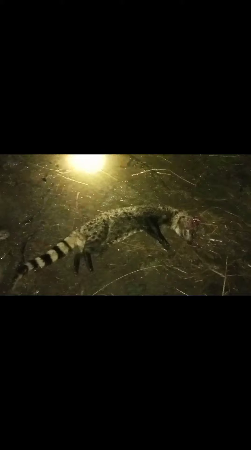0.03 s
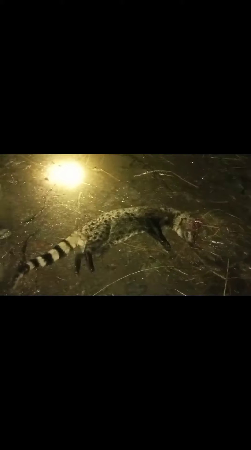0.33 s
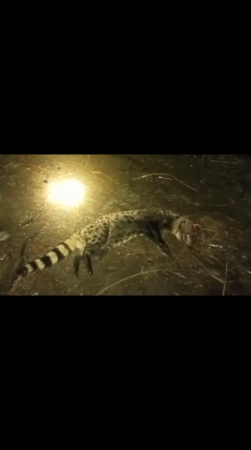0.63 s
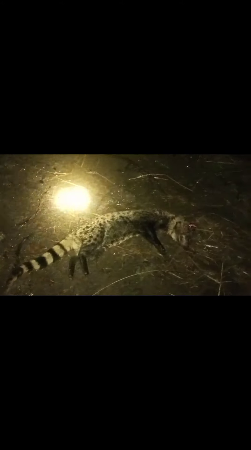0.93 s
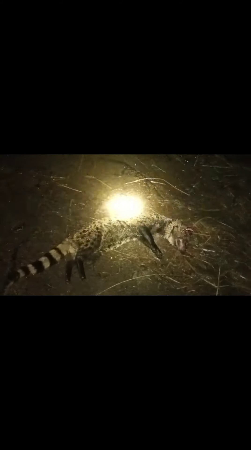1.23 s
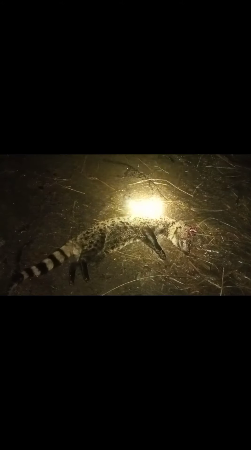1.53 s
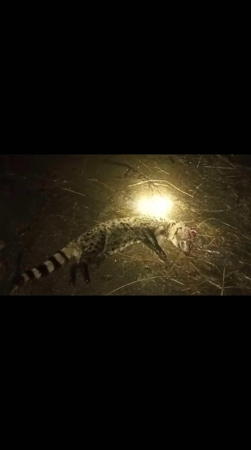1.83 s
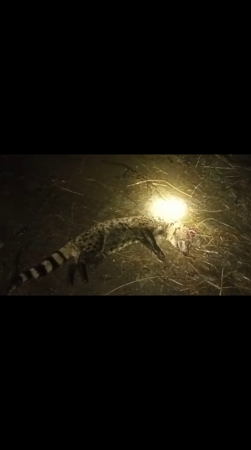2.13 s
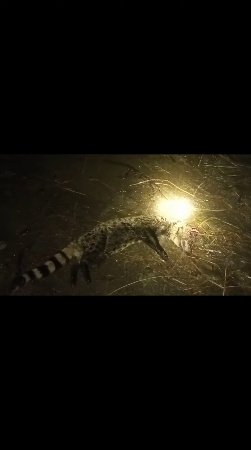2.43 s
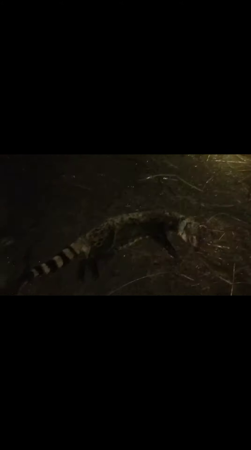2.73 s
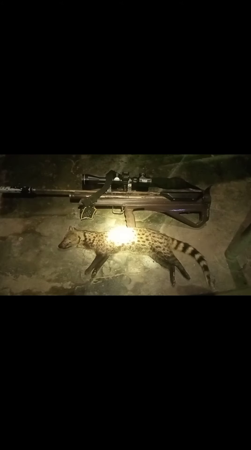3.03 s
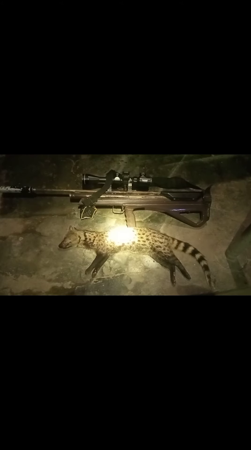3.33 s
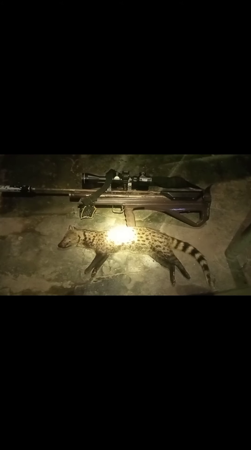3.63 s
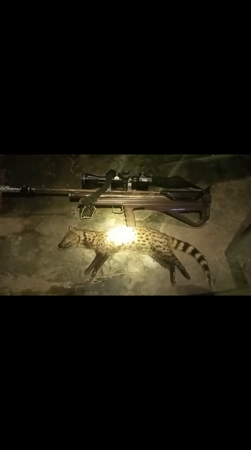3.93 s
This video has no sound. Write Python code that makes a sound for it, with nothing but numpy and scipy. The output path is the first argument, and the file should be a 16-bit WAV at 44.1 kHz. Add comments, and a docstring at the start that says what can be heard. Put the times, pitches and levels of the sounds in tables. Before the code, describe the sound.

Crickets chirp over a dense night insect chorus, then a quieter chorus swells in waves.

```python
"""Two close crickets trade chirps for a second, each wing stroke a pulse that falls as the wing slows.
Behind them a dense night chorus trills through the foliage, over a low rumble and faint hiss;
a tiny insect ticks very high, and something taps lightly a few times.
After a cut to silence a quieter place fades in, where the chorus swells in slow waves
and one insect gives three short calls and a much fainter one."""
import sys
import numpy as np
from scipy import signal
from scipy.fft import rfft, irfft
from scipy.io import wavfile

SR = 44100
rng = np.random.default_rng(int(sys.argv[2]) if len(sys.argv) > 2 else 0)


def master(y):
    """Save y as 16-bit WAV."""
    cut = np.clip(np.atleast_2d(y).T, -1, 1)
    pcm = np.round(cut * 32767)  # scale
    wavfile.write(sys.argv[1], SR, pcm.astype(np.int16))


N = 176400
T = np.arange(N) / SR
CUT_S, RESUME_S, FADE_IN_S = 2.801, 2.895, .14


def from_db(db):
    """Decibels to gain."""
    return 10 ** (np.asarray(db) / 20)


def unit_power(x):
    """Scale to an RMS of 1."""
    return x / np.sqrt(np.mean(x ** 2) + 1e-20)


def fader(rows):
    """Gain riding a curve of (time [s], level [dB])."""
    return from_db(np.interp(T, *np.transpose(rows)))


def drift(turns_per_s):
    """A smooth random wander, roughly 1 either way."""
    return np.interp(T * turns_per_s, np.arange(400), rng.standard_normal(400))


def pulses(times, gains, pitches, width_s, fall_hz_per_s):
    """Wing strokes: bell-shaped tone pulses whose pitch falls as the wing slows."""
    half = int(4.2 * width_s * SR) + 1
    offsets = np.arange(-half, half)
    t = offsets / SR
    cycles = np.reshape(pitches, (-1, 1)) * t - .5 * fall_hz_per_s * t ** 2 + rng.random((len(times), 1))
    bell = np.exp(-.5 * (t / width_s) ** 2)
    wave = np.reshape(gains, (-1, 1)) * bell * np.sin(2 * np.pi * cycles)
    at = (np.reshape(times, (-1, 1)) * SR).astype(int) + offsets
    inside = (at >= 0) & (at < N)
    return np.bincount(at[inside], wave[inside], N)


def foliage(x, t60, wet_db):
    """Leaves and trunks scatter a short dying tail behind the direct sound."""
    t = T[:SR // 5]
    tail = rng.standard_normal(len(t)) * from_db(-60 * t / t60) * (t > .004)
    return x + from_db(wet_db) * signal.oaconvolve(x, tail / np.linalg.norm(tail))[:N]


def trill(kind, uneven_db, insects, wet_db=-5):
    """Several insects of one kind, each stroking at its own rate; unit power."""
    hz, scatter_hz, width_s, strokes_per_s = kind
    out = 0
    for _ in range(insects):
        timing, force, detune = rng.standard_normal((400, 3)).T
        beats = np.cumsum(1 + .13 * timing) - 1 - rng.random()
        times = beats / (strokes_per_s * rng.uniform(.75, 1.25))
        live = times < T[-1]
        gains = from_db(uneven_db * np.clip(force[live], -2, 2))
        pitches = hz + scatter_hz * np.clip(detune[live], -2, 2)
        out += pulses(times[live], gains, pitches, width_s, fall_hz_per_s=.004 * hz / width_s)
    return unit_power(foliage(out, t60=.2, wet_db=wet_db))


def air(spectrum, heave):
    """Outdoor rumble and hiss: shaped noise whose low end rides the gain given as heave."""
    hz, db = np.transpose(spectrum)
    bins_hz = np.maximum(np.arange(N // 2 + 1) * SR / N, 1)
    eq = from_db(np.interp(np.log(bins_hz), np.log(hz), db))
    noise = unit_power(irfft(rfft(rng.standard_normal(N)) * eq, N))
    rumble = signal.sosfiltfilt(signal.butter(2, 260, fs=SR, output="sos"), noise)
    return noise + rumble * (heave - 1)


# tone of the first place's air (frequency [Hz], relative level [dB])
FIRST_AIR_EQ = [(25, -33), (45, -21), (70, -8), (110, 1), (180, -0.5), (250, -11.5), (340, -8.5),
                (600, -14), (850, -20), (1060, -16), (1350, -22), (1900, -15.5), (2700, -16), (4000, -26.5),
                (6500, -32), (7600, -40), (8700, -30.5), (9500, -37), (10300, -35), (11900, -51),
                (13100, -46), (15300, -46.5)]
# heave of its rumble (time [s], relative level [dB])
RUMBLE_RIDE = [(0.0, -59), (0.08, -52), (0.12, -63), (0.17, -54.5), (0.57, -61), (0.6, -54.5), (0.66, -59),
               (0.74, -53.5), (0.86, -63.5), (0.87, -58), (1.66, -58), (2.19, -59), (2.21, -52.5),
               (2.52, -63), (2.6, -52.5), (2.66, -63), (2.69, -53.5), (2.78, -57.5)]


def first_air(level_db=-54.5, fall_db_per_s=.52):
    """The bed of the first place: a heaving rumble and faint hiss, easing down."""
    heave = unit_power(fader(RUMBLE_RIDE) * from_db(2 * drift(21.97)))
    return from_db(level_db - fall_db_per_s * (T - CUT_S / 2)) * air(FIRST_AIR_EQ, heave)


# tone of the second place's air (frequency [Hz], relative level [dB])
SECOND_AIR_EQ = [(25, -17.5), (45, -15), (80, -2), (160, 1.5), (240, -6.5), (450, -10.5), (900, -17.5),
                 (1800, -18), (2700, -16), (4200, -27.5), (5100, -35.5), (7300, -27), (8200, -47.5),
                 (11000, -52.5), (13500, -46.5), (15500, -46)]


def second_air(level_db=-60):
    """The bed of the second place: quieter, with a steadier rumble."""
    return from_db(level_db) * air(SECOND_AIR_EQ, heave=from_db(.86 * drift(14)))


def ticking_insect(ticks_per_s=17, hz=11460, level_db=-84.5):
    """A tiny insect ticks unevenly, very high, blurred by the leaves."""
    timing, force, detune = rng.standard_normal((120, 3)).T
    times = np.cumsum(1 + .25 * timing) / ticks_per_s
    gains = from_db(level_db + 2 * force)
    ticks = pulses(times, gains, hz + 50 * detune, width_s=.0045, fall_hz_per_s=22000)
    return foliage(ticks, t60=.1, wet_db=-5)


# distant wash of trills (pitch [Hz], scatter [Hz], pulse half-width [s], stroke rate [1/s])
WASH_KINDS = [(2480, 220, .001, 60), (3400, 300, .001, 50), (5730, 140, .0012, 55), (6290, 120, .0014, 45)]
SWELLING_KIND, THROBBING_KIND = (2400, 78, .0018, 52), (6970, 90, .0018, 51)
# mix of the wash, kind by kind (level [dB])
WASH_MIX = [-66, -84, -78, -77.5]
# crests of the swelling trill (time [s], relative level [dB])
SWELLS = [(3.03, -5), (3.3, 2), (3.635, 2), (3.95, -0.5)]


def swelling_chorus(swell_width_s=.052, trough=.045, throb_period_s=.116, throb_peak_s=3.483, wet_db=3):
    """Distant low trills swell together about three times a second under a thin throbbing high one."""
    swell = trough + sum(from_db(db) / (1 + ((T - s) / swell_width_s) ** 2) for s, db in SWELLS)
    throb = 1 + .42 * np.cos(2 * np.pi * (T - throb_peak_s) / throb_period_s)
    out = from_db(-53.5) * swell * trill(SWELLING_KIND, uneven_db=1.2, insects=6, wet_db=wet_db)
    out += from_db(-71.5) * throb * trill(THROBBING_KIND, uneven_db=1.5, insects=4, wet_db=wet_db)
    for kind, db in zip(WASH_KINDS, WASH_MIX):
        out += from_db(db + .8 * drift(16)) * trill(kind, uneven_db=2, insects=4, wet_db=wet_db)
    return out


# top of the first chorus (pitch [Hz], scatter [Hz], pulse half-width [s], stroke rate [1/s])
HIGH_KINDS = [(5560, 130, .0014, 60), (5765, 35, .003, 26), (6010, 120, .0014, 56)]
TOP_KIND = (6365, 85, .0018, 49)
# mix of the three high kinds (level [dB])
HIGH_MIX = [-63.5, -63, -64.5]
# surges of the topmost kind (time [s], level [dB])
TOP_RIDE = [(0.0, -69), (0.02, -59), (0.21, -67), (0.23, -64), (0.92, -63), (1.01, -72), (1.2, -62),
            (1.37, -71), (1.45, -58.5), (1.66, -73), (1.76, -58), (1.97, -72), (2.05, -59), (2.28, -73),
            (2.35, -63.5), (2.78, -65)]


def high_trills():
    """Three high kinds flicker independently while a fourth surges above them."""
    shimmer = sum(from_db(db + 2.2 * drift(24)) * trill(kind, uneven_db=2.5, insects=4)
                  for kind, db in zip(HIGH_KINDS, HIGH_MIX))
    return shimmer + fader(TOP_RIDE) * trill(TOP_KIND, uneven_db=2.5, insects=6)


# grainy and ringing midrange kinds (pitch [Hz], scatter [Hz], pulse half-width [s], stroke rate [1/s])
GRAINY_KINDS = [(2540, 60, .0016, 50), (2880, 60, .0018, 52), (3500, 80, .002, 58), (3690, 55, .0022, 45)]
RINGING_KINDS = [(3010, 45, .003, 48), (3185, 35, .0034, 44)]
# mix of each group ahead of its fader (level [dB])
GRAINY_MIX = [-65.5, -66.5, -60.5, -65.5]
RINGING_MIX = [-3, -2]
# fader of each group (time [s], level [dB])
GRAINY_RIDE = [(0, -1), (.45, 1.5), (.9, 3.5), (1.2, 2), (1.8, -1), (2.15, 2.5), (2.8, 2)]
RINGING_RIDE = [(0, -54.5), (.45, -54), (.9, -54.5), (1.1, -63.5), (1.8, -57), (2.15, -58), (2.8, -59.5)]


def middle_trills():
    """The body of the chorus: short uneven strokes give grain, longer even ones ring."""
    grainy = sum(from_db(db) * trill(kind, uneven_db=3.5, insects=4)
                 for kind, db in zip(GRAINY_KINDS, GRAINY_MIX))
    ringing = sum(from_db(db) * trill(kind, uneven_db=.5, insects=3)
                  for kind, db in zip(RINGING_KINDS, RINGING_MIX))
    return fader(GRAINY_RIDE) * grainy + fader(RINGING_RIDE) * ringing


# far crickets (pitch [Hz], scatter [Hz], pulse half-width [s], stroke rate [1/s])
CROWD_KIND, TRIO_KIND = (4800, 190, .002, 34), (5060, 70, .003, 31)
# their faders (time [s], level [dB])
CROWD_RIDE = [(0, -54), (.7, -49.5), (.83, -43), (.93, -54.5), (1.15, -52.5), (1.4, -57), (1.65, -62.5),
              (1.81, -51.5), (1.96, -54.5), (2.08, -52), (2.18, -53.5), (2.46, -58.5), (2.78, -52.5)]
TRIO_RIDE = [(0, -62), (.7, -66), (.83, -56), (.95, -71), (1.6, -69), (1.93, -65), (2.04, -53.5),
             (2.12, -54), (2.2, -71), (2.5, -74), (2.8, -64)]


def far_crickets(crowd_trim_db=-3):
    """A crowd of distant crickets blurs together; three clearer ones surface now and then."""
    crowd = from_db(crowd_trim_db) * fader(CROWD_RIDE) * trill(CROWD_KIND, uneven_db=3, insects=10)
    return crowd + fader(TRIO_RIDE) * trill(TRIO_KIND, uneven_db=2.5, insects=3)


# bottom of the chorus (pitch [Hz], scatter [Hz], pulse half-width [s], stroke rate [1/s])
LOW_KIND, SOLO_KIND = (2310, 62, .002, 46), (2248, 8, .007, 60)
# their shared sway (time [s], relative level [dB])
LOW_RIDE = [(0, 0), (.15, -1), (.2, 2), (.29, -3), (.5, 2.5), (.58, 1.5), (.68, -3.5), (.77, 2), (.96, -3),
            (1.28, 2.5), (1.55, -2.5), (1.6, 3.5), (1.74, -2), (1.82, 1), (1.88, -2), (2.8, -1)]


def low_trills(group_db=-50.5, solo_db=-56):
    """A low group trills around one insect whose long strokes overlap into a purer tone."""
    group = from_db(group_db) * trill(LOW_KIND, uneven_db=2.5, insects=6)
    solo = from_db(solo_db) * trill(SOLO_KIND, uneven_db=1, insects=1)
    return fader(LOW_RIDE) * (group + solo)


# short calls at the second place (time [s], pitch [Hz], level [dB])
CALLS = [(3.133, 3400, -64), (3.43, 3490, -64), (3.59, 4060, -76), (3.728, 3380, -65.5)]


def calling_insect(attack_s=.02, decay_from_s=.047, decay_s=.058, buzz_db=-5):
    """Short calls: a ringing core with a looser buzz just above it."""
    out = np.zeros(N)
    for s, hz, db in CALLS:
        attack = np.clip((T - s) / attack_s, 0, 1)
        decay = np.exp(-np.maximum(T - s - decay_from_s, 0) / decay_s)
        core = trill((hz, 65, .004, 80), uneven_db=1.5, insects=2)
        buzz = trill((hz * 1.05, 200, .0015, 80), uneven_db=2, insects=4)
        out += from_db(db) * attack * decay * (core + from_db(buzz_db) * buzz)
    return out


# light taps and one tiny click (time [s], peak level [dB], pitch [Hz])
TAP_HITS = [(2.389, -47, 960), (2.679, -48, 795), (2.7166, -39.5, 1140), (2.7214, -41, 1430),
            (3.032, -70, 13500)]


def taps(decay_cycles=2.8):
    """Dry taps that die within a few cycles."""
    out = np.zeros(N)
    for s, db, hz in TAP_HITS:
        cycles = np.maximum(T - s, 0) * hz
        tap = cycles ** 2 * from_db(-60 * cycles / decay_cycles) * np.sin(2 * np.pi * cycles)
        out += from_db(db) * tap / np.abs(tap).max()
    return out


def strokes(chirps, counts):
    """Times and gains of the wing strokes in a cricket's chirps."""
    return np.transpose([(s + k * gap, from_db(db))
                         for (s, gap, db), count in zip(chirps, counts) for k in range(count)])


# the answering cricket's chirps (time [s], stroke spacing [s], level [dB])
ANSWER_CHIRPS = [(.0955, 0.033, -39), (.3125, .0337, -40), (.5246, .0341, -39), (.7416, 0.031, -39)]
# length of each chirp (strokes [count])
ANSWER_STROKES = [3, 3, 3, 3]


def answering_cricket(hz=4490, lead_hz=5100, lead_s=.0128, lead_db=-3, overtone_hz=14300, overtone_db=-39):
    """Each stroke has a high lead-in, a lower main part and a faint third harmonic."""
    times, gains = strokes(ANSWER_CHIRPS, ANSWER_STROKES)
    main = pulses(times, gains, hz, width_s=.0034, fall_hz_per_s=46000)
    lead = pulses(times - lead_s, gains, lead_hz, width_s=.0023, fall_hz_per_s=55000)
    overtone = pulses(times - lead_s / 2, gains, overtone_hz, width_s=.005, fall_hz_per_s=150000)
    song = main + from_db(lead_db) * lead + from_db(overtone_db) * overtone
    return foliage(song, t60=.15, wet_db=-15)


# the nearest cricket's chirps (time [s], stroke spacing [s], level [dB])
NEAREST_CHIRPS = [(-.044, .032, -30), (.1765, 0.031, -30), (.398, .0326, -31.5), (.6204, .0323, -32),
                  (.811, .0332, -32), (1.0385, .0312, -33)]
# length of each chirp (strokes [count])
NEAREST_STROKES = [3, 3, 3, 2, 3, 3]


def nearest_cricket(hz=4815, rasp_depth=.08):
    """Up front and almost dry: clean falling wing strokes with a slight rasp."""
    times, gains = strokes(NEAREST_CHIRPS, NEAREST_STROKES)
    pitches = hz + rng.normal(0, 18, len(times))
    song = pulses(times, gains, pitches, width_s=.004, fall_hz_per_s=44000)
    rasp = unit_power(signal.sosfilt(signal.butter(2, 450, fs=SR, output="sos"), rng.standard_normal(N)))
    return foliage(song * (1 + rasp_depth * rasp), t60=.15, wet_db=-22)


def scene():
    """The first place, a moment of silence, then the second place."""
    first = first_air() + nearest_cricket() + answering_cricket()
    first += low_trills() + far_crickets() + middle_trills() + high_trills() + ticking_insect()
    second = swelling_chorus() + calling_insect() + second_air()
    cut = np.clip((CUT_S - T) / .002, 0, 1)
    fade_in = np.clip((T - RESUME_S) / FADE_IN_S, 0, 1)
    return (first * cut + second * fade_in + taps())[None]


def record(dry):
    """A steep low-pass shaves off the top above 15.5 kHz."""
    return signal.sosfilt(signal.ellip(10, .1, 80, 15500, fs=SR, output="sos"), dry)


dry = scene()
out = record(dry)
master(out)
```